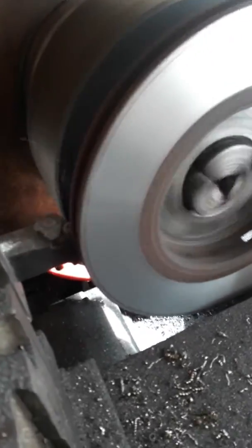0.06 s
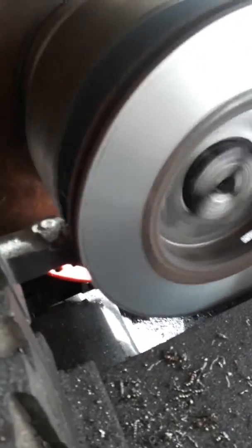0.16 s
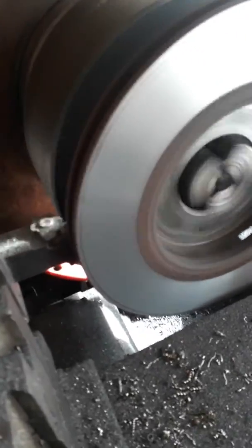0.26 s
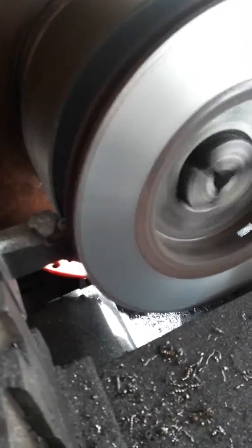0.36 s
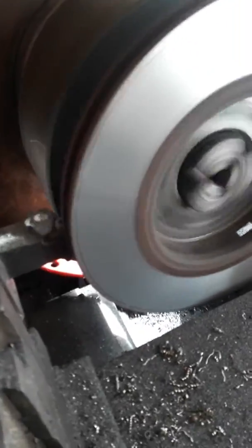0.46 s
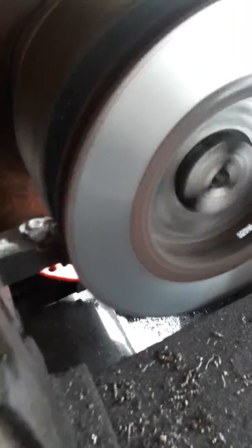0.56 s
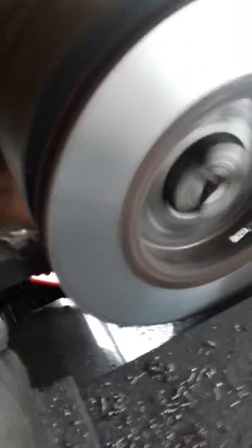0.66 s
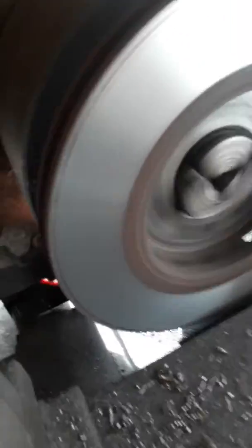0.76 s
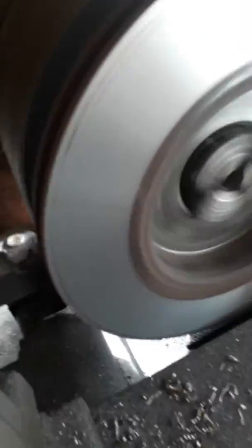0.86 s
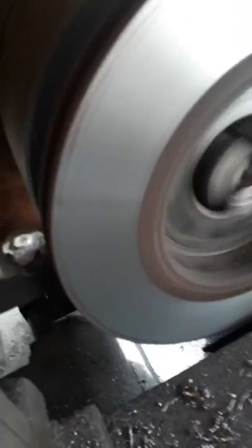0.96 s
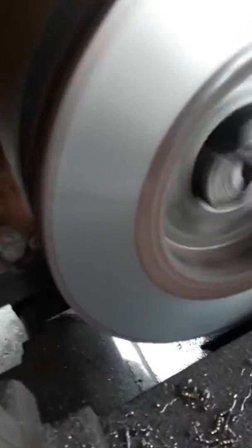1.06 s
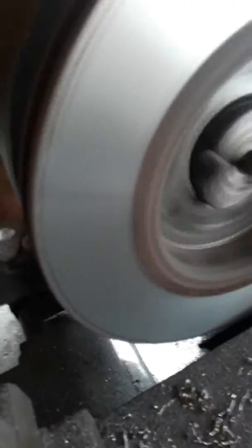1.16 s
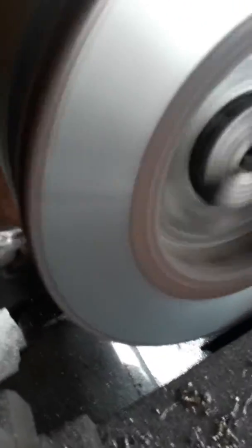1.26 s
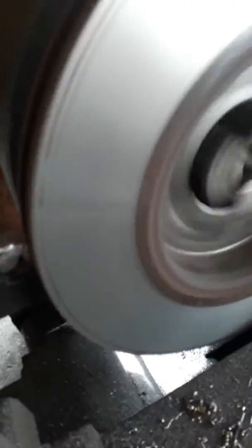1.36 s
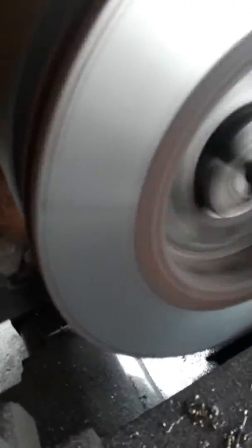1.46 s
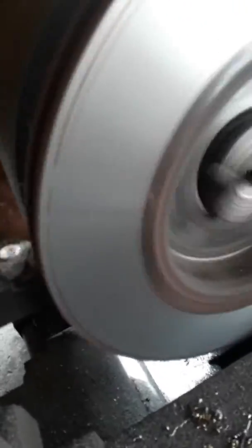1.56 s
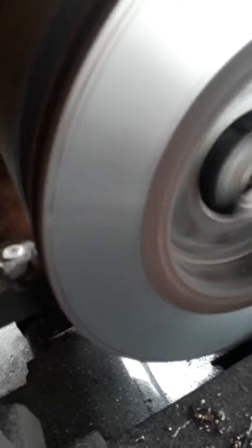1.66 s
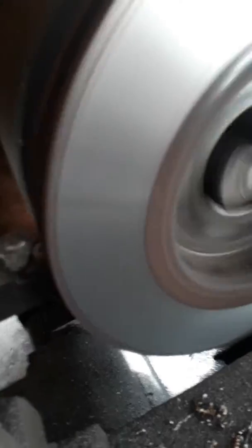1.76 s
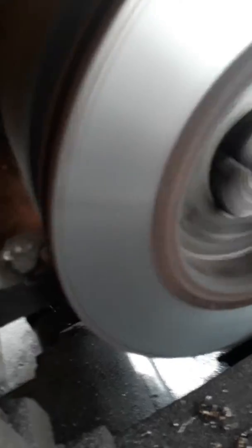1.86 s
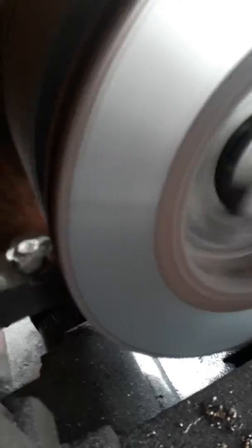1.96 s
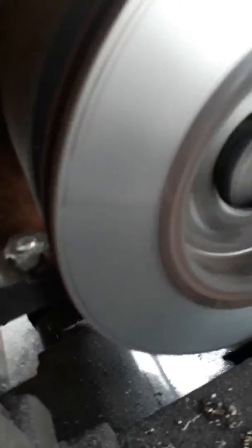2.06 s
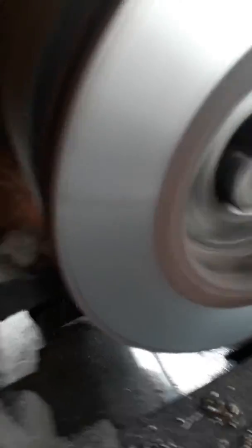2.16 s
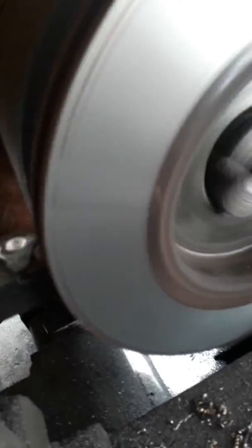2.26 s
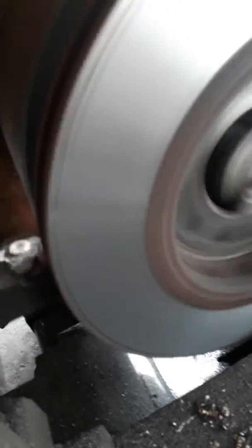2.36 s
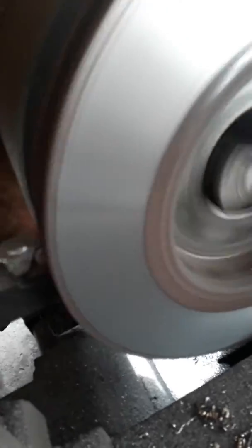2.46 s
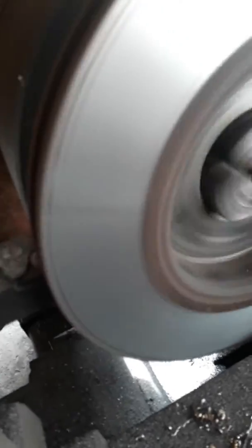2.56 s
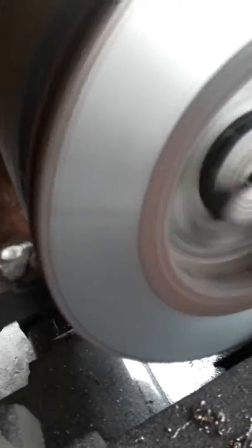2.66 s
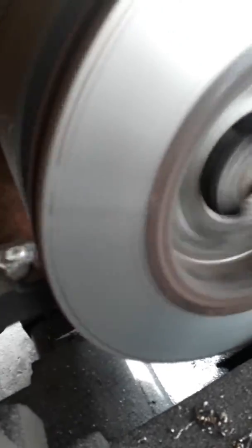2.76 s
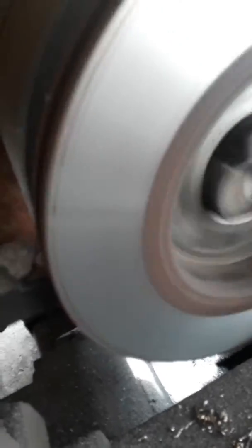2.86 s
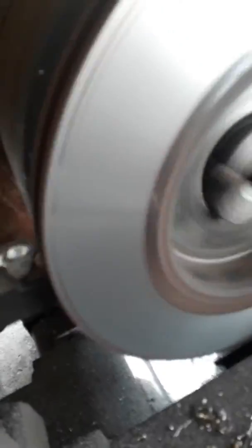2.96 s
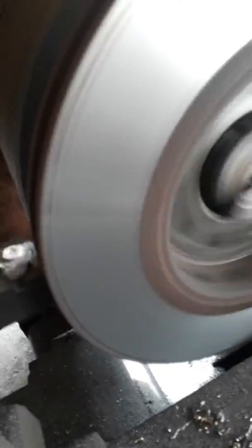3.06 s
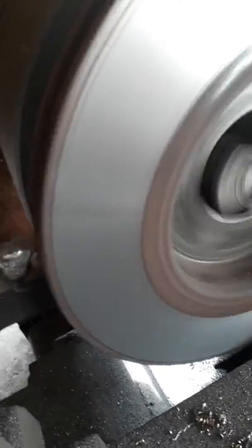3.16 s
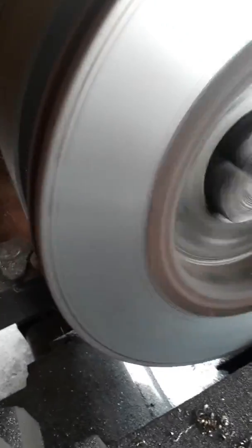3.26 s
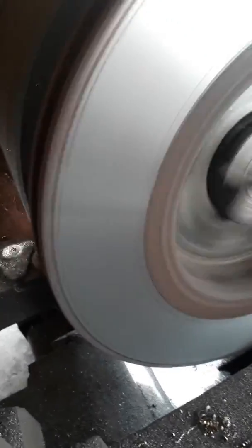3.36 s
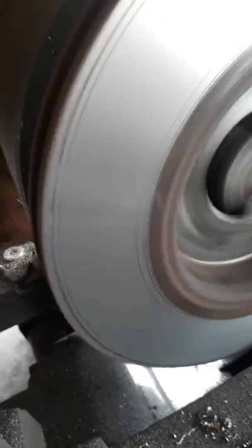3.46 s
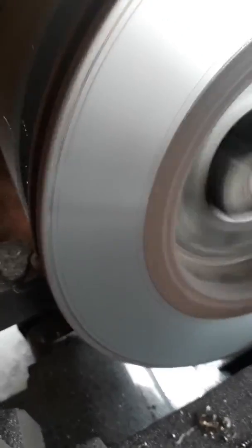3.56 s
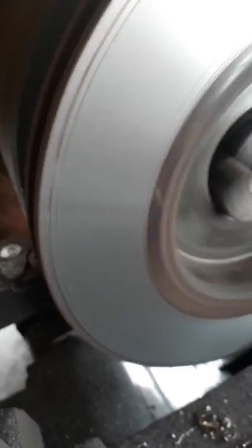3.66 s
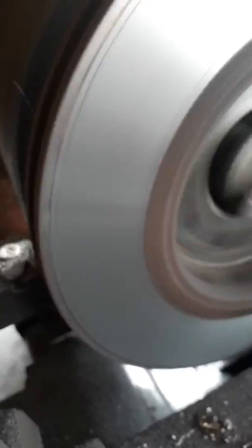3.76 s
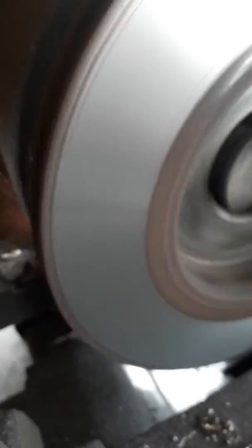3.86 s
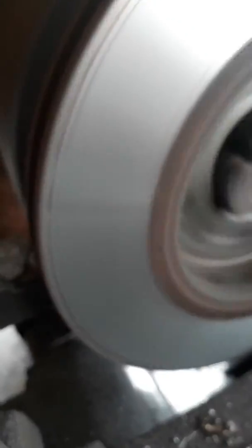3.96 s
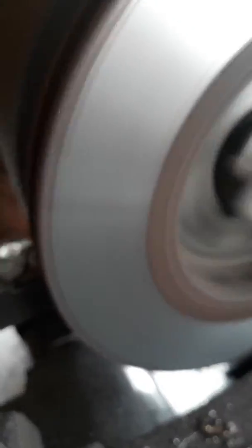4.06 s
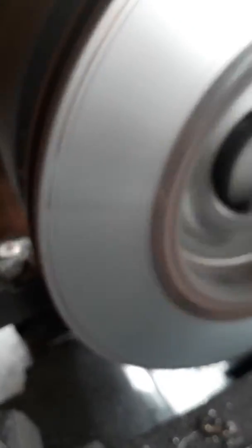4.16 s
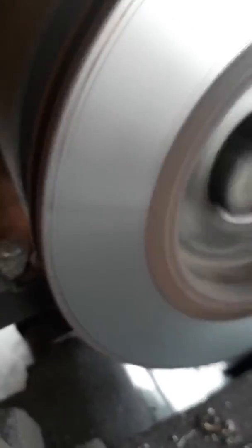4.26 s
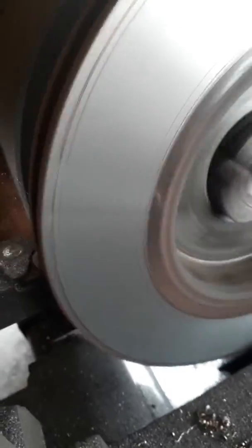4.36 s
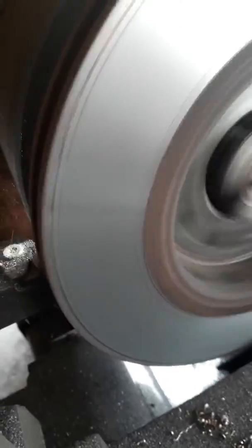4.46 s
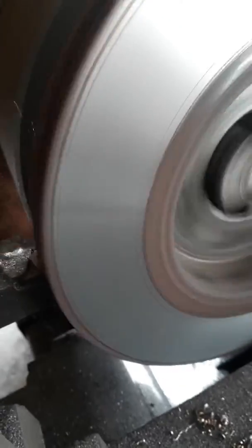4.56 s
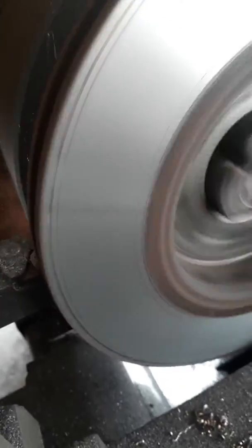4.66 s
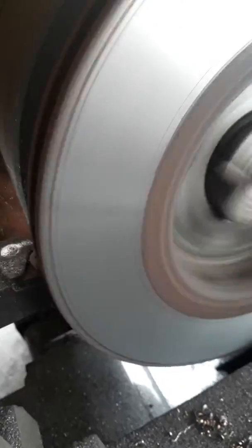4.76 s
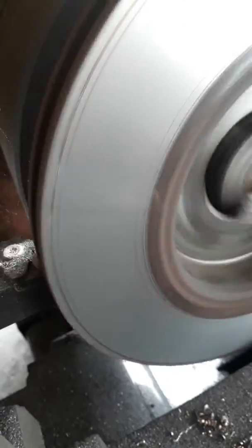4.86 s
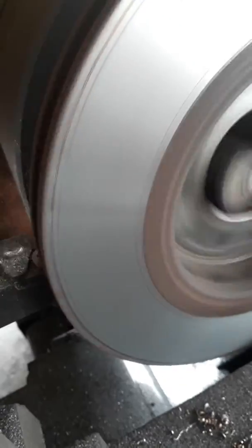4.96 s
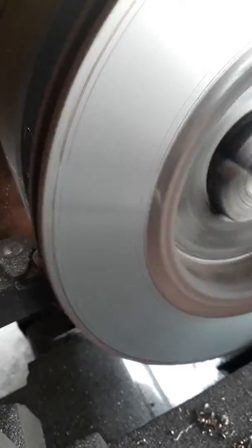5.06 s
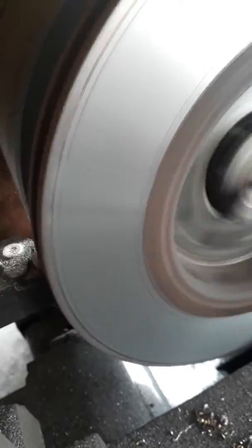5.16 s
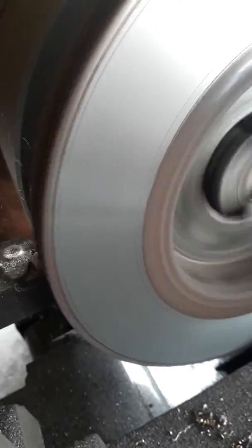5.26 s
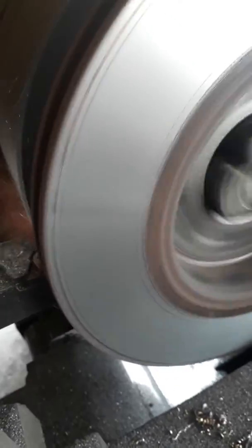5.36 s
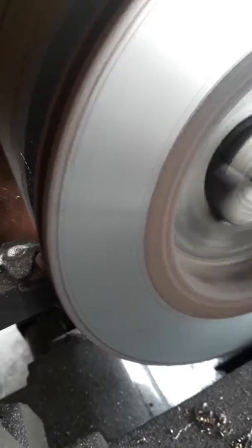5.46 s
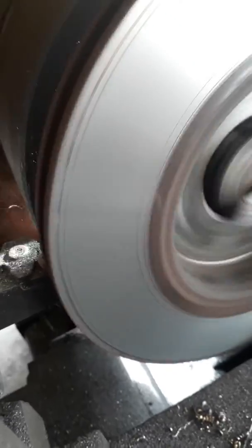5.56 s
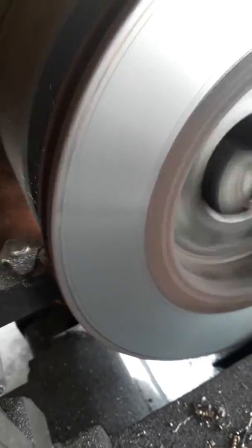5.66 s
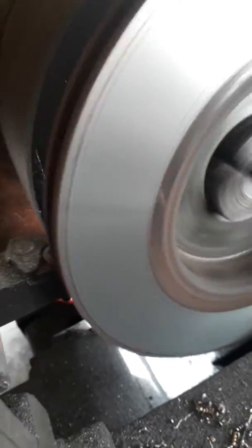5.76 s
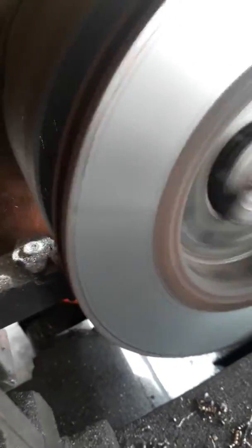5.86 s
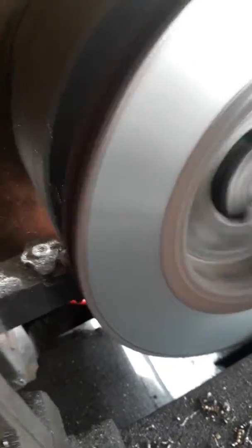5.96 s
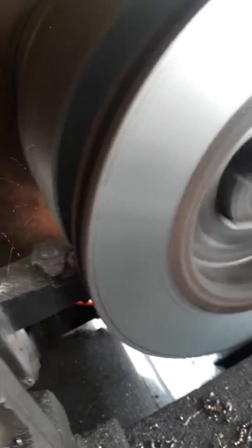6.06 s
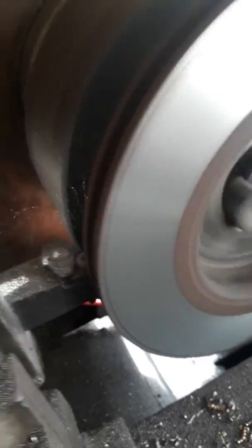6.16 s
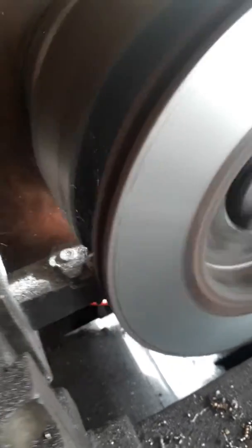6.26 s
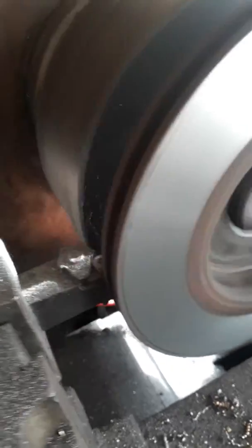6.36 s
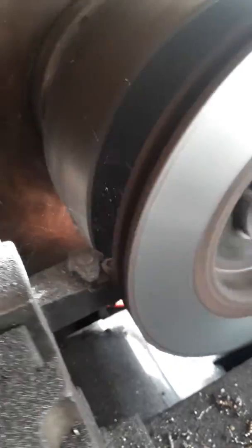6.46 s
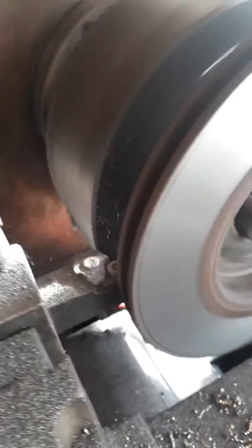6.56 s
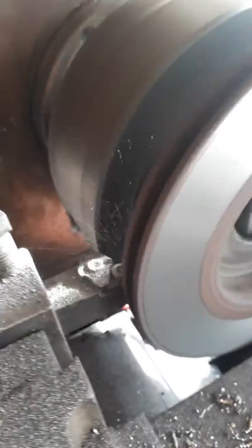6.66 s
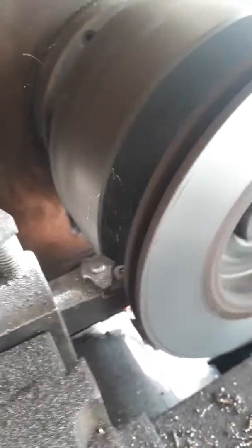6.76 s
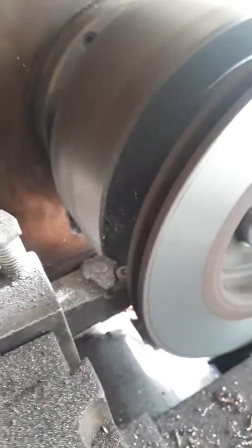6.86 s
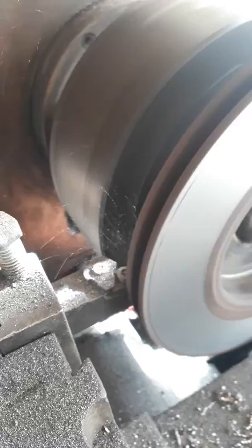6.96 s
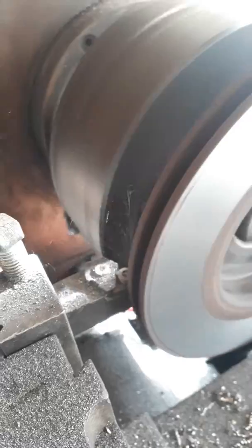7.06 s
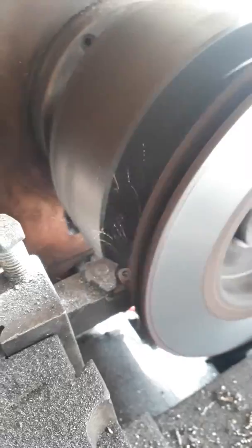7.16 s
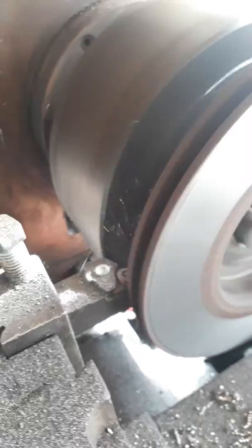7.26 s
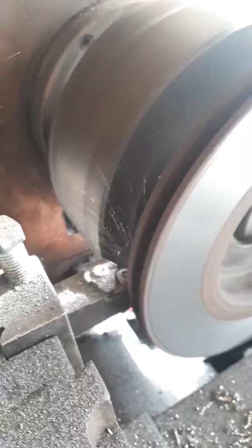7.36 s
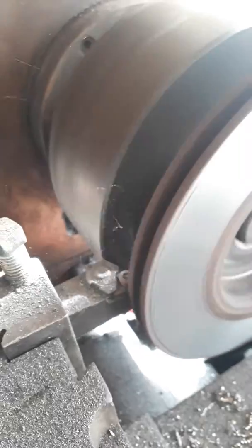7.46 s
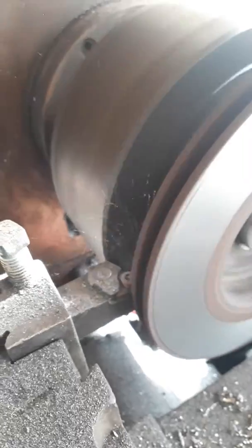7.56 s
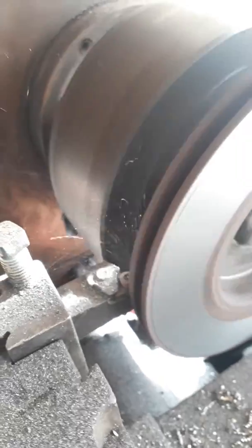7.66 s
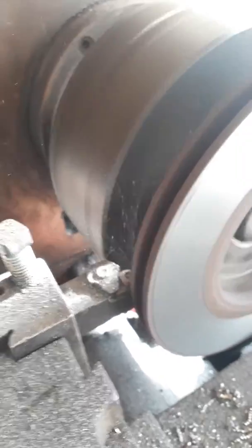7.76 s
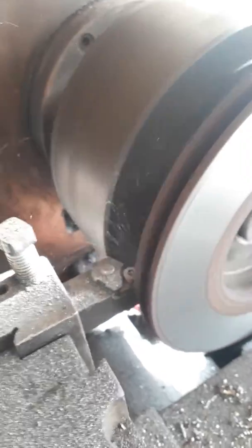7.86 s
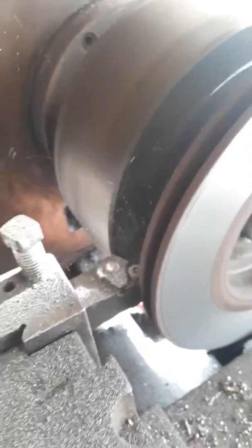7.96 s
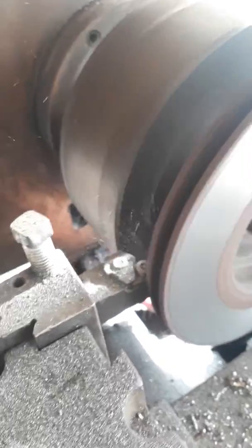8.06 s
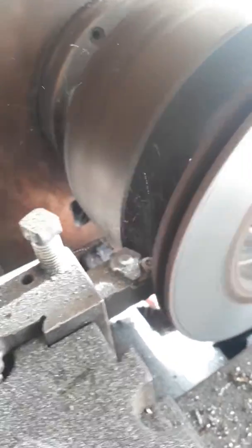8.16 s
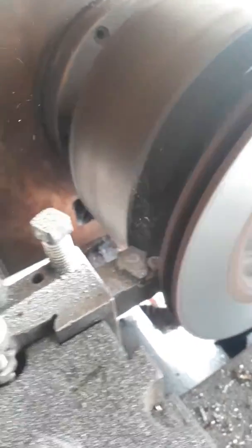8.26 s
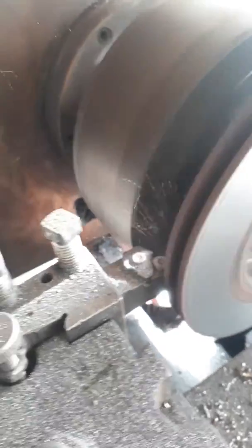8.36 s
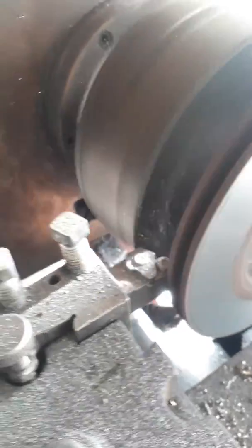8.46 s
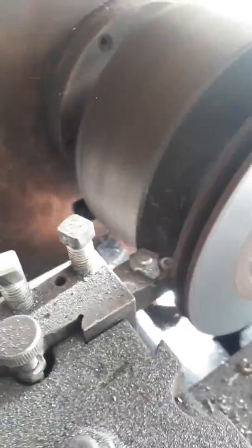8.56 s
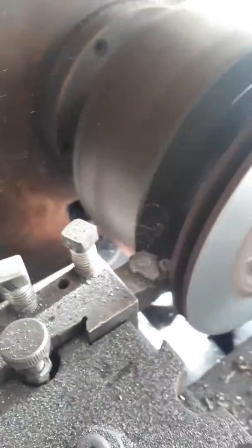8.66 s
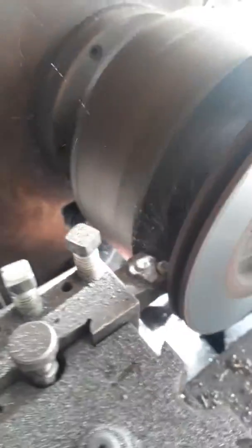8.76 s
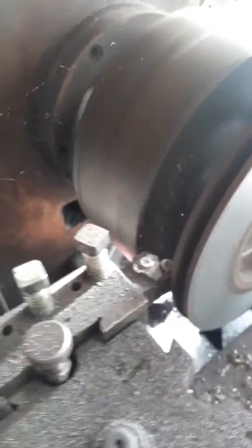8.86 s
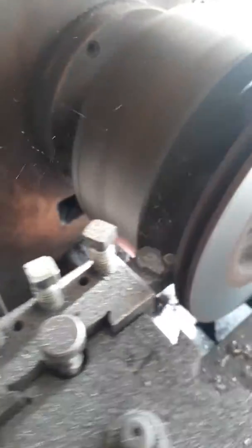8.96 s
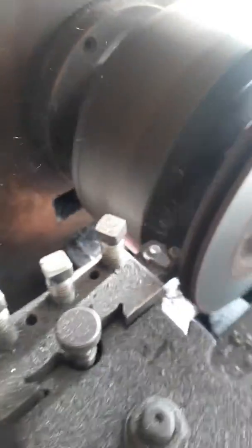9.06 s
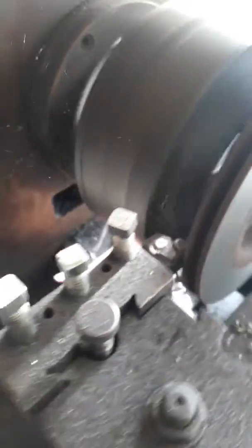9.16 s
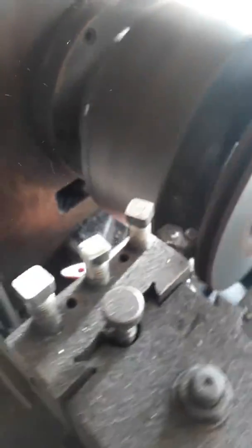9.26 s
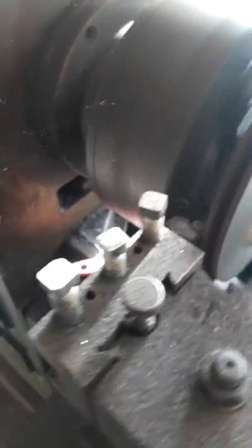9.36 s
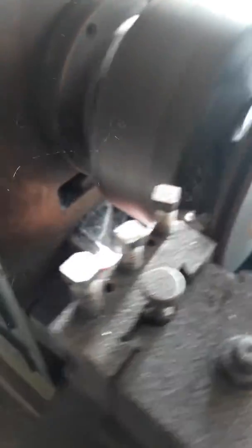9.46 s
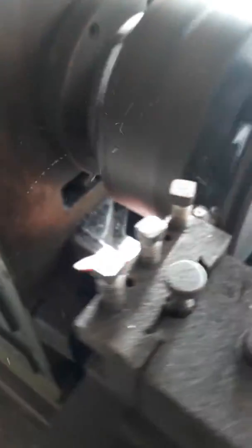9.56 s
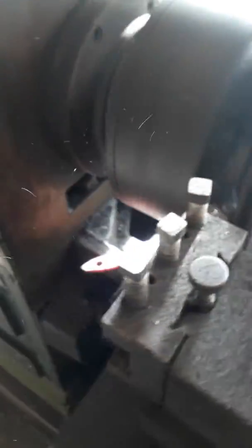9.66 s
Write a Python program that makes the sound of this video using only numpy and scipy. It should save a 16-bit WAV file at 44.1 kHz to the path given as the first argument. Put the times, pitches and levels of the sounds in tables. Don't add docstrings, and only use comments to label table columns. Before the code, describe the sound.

A lathe runs steadily in a workshop, its tool shaving a spinning cast-iron disc. A shrill, many-pitched metallic ring shimmers and beats with each turn, mixed with gritty scraping hiss. Beneath are low housing rumble, gear whine and a soft knocking, howling pulse about four times a second. The close handheld stereo microphone faces the disc, then swings to the tool post, where the ring weakens and the machinery stands out more.

```python
import sys
import numpy as np
from scipy import signal
from scipy.io import wavfile

SR = 44100
rng = np.random.default_rng(int(sys.argv[2]) if len(sys.argv) > 2 else 0)


def attenuation_scalar(level_db):
    decades = np.asarray(level_db, float) / 20
    return 10 ** decades


def unload_audio(sound):
    columns = np.transpose(np.atleast_2d(sound))
    steps = np.round(np.clip(columns, -1, 1) * 32767)
    wavfile.write(sys.argv[1], SR, steps.astype(np.int16))


N = 427769
SECONDS = np.arange(N) / SR
SHAFT_HZ = 14.087
SPINDLE_HZ = SHAFT_HZ * 20 / 66
SPINDLE_TURNS = SPINDLE_HZ * SECONDS
SIDES = np.array([[0.5], [-0.5]])


def rms_one(x):
    return x / np.sqrt(np.mean(np.abs(x) ** 2) + 1e-20)


def gain_of(db):
    return np.repeat(attenuation_scalar(db[..., ::8]), 8, axis=-1)[..., :N]


def at_hz(points, hz):
    table = np.array(points)
    return np.array([[np.interp(np.log(hz), np.log(table[:, 0]), c)] for c in table.T[1:]])


def at_view(levels_db, view):
    return np.interp(view, np.linspace(0, 2, len(levels_db)), levels_db)


def drift(rate_hz):
    pole = np.exp(-80 * np.pi * rate_hz / SR)
    white = rng.standard_normal(N // 40 + 2002)
    slow = signal.lfilter([1], [1, -2 * pole, pole * pole], white)[2000:]
    return np.interp(np.arange(N) / 40, np.arange(len(slow)), rms_one(slow))


def mode(force, hz, width_hz):
    pole = np.exp((2j * hz - width_hz) * np.pi / SR)
    return signal.lfilter([1], [1, -pole], force)


# t/s, view (0 disc face, 1 disc edge, 2 tool post), nearness level/dB
MICROPHONE_SWING = [(0, 0.44, -0.4), (.6, 0.53, .1), (1.4, 0.017, 0.3), (2.6, 0.021, 0.2),
                    (3.6, 0.012, 0.4), (5.2, 0.11, 0.6), (6.0, 0.41, -0.1), (6.5, 0.74, -0.1),
                    (7.1, 1.03, -0.1), (8.0, 1.22, 0.3), (8.7, 1.76, 0.7), (9.2, 2, .1), (9.7, 2.02, -3)]


def microphone():
    t, view, near_db = np.transpose(MICROPHONE_SWING)
    return np.interp(SECONDS, t, view), np.interp(SECONDS, t, near_db)


# f/Hz, likeness (-1 to 1)
PORT_LIKENESS = [(25, .97), (60, .99), (250, 0.87), (600, 0.57), (1200, -0.37), (2200, 0.6), (3200, -0.78),
                 (4600, -0.067), (6500, -0.11), (15000, 0.25)]


def banded_noise(band_db, low_hz, high_hz, count, patchy_db):
    out, together, edges = 0, drift(6.6), np.geomspace(low_hz, high_hz, count + 1)
    white = rng.standard_normal((2, 2, N)) * np.sqrt(SR / 4)
    for k, (low, high) in enumerate(zip(edges, edges[1:])):
        band = signal.butter(2, [low, high], "band", fs=SR, output="sos")
        mid, side = signal.sosfilt(band, white[k % 2])
        hz = np.sqrt(low * high)
        alike = np.clip(at_hz(PORT_LIKENESS, hz), -1, 1)
        gain = gain_of(band_db(hz) + patchy_db * (0.45 * together + drift(24)))
        out = out + gain * (np.sqrt(1 + alike) * mid + np.sqrt(1 - alike) * side * 2 * SIDES)
    return out


# f/Hz, level/dB per Hz
RUMBLE_SPECTRUM = [(25, -46), (60, -31), (120, -23), (200, -16.5), (330, -14.5), (450, -14), (600, -7.5),
                   (800, -8), (950, -8.5), (1250, -11.5), (1600, -20), (2400, -21.5)]
# f/Hz, bandwidth/Hz, level/dB, left-right difference/dB
HOUSING_MODES = [(90, 8.2, -26.5, 0.1), (126.4, 26, -18.5, 0), (203.4, 11, -13, -0.5), (236, 19, -18, 2.5),
                 (498, 52, -12, 5), (740, 90, -9, 6.5), (1045, 70, -5, 6.5), (1359, 77, -12, 2.5)]


def housing_rumble(view, near_db):
    rumble = rms_one(banded_noise(lambda hz: at_hz(RUMBLE_SPECTRUM, hz), 26.9, 2334, count=14, patchy_db=1.85))
    for hz, width, level_db, pan_db in HOUSING_MODES:
        shake = mode(rng.standard_normal((2, N)), hz, width).real
        alike = np.clip(at_hz(PORT_LIKENESS, hz)[0], 0, 1)
        shake[1] = alike * (shake[0] - shake[1]) + shake[1]
        rumble = rumble + rms_one(shake) * attenuation_scalar(level_db + SIDES * pan_db)
    level_db = near_db + at_view((-27.5, -26, -26), view)
    pan_db = at_view((-0.5, 0.5, -0.5), view)
    return rumble * attenuation_scalar(level_db + SIDES * pan_db)


def gear_lines(table, turn_hz, swell_db, own_db):
    out, waver = np.zeros((2, N)), drift(0.82)
    for multiple, left_db, right_db, lead in table:
        multiple = round(multiple)
        phase = 2 * np.pi * (multiple * turn_hz * SECONDS + rng.random())
        phase = phase + 0.65 * np.roll(waver, rng.integers(N))
        level_db = own_db.get(multiple, np.array([[left_db], [right_db]]) + swell_db)
        out += np.sqrt(2) * gain_of(level_db) * np.sin(phase + [[lead], [0]])
    return out


# multiple of shaft speed, left level/dB, right level/dB, left lead/rad
SHAFT_WHINE = [(20.0, -48.0, -46.0, 0.3), (35.0, -40.0, -41.0, -0.1), (36.0, -36.0, -45.0, 0.3),
               (37.0, -48.0, -49.0, 0.4), (41.0, -48.0, -49.0, 0.3), (42.0, -47.0, -51.0, 1.0),
               (44.0, -56.0, -49.0, 1.0), (45.0, -49.0, -56.0, 0.5), (46.0, -46.0, -43.0, 1.3),
               (47.0, -28.0, -27.0, 0.8), (48.0, -45.0, -42.0, 0.7), (49.0, -48.0, -39.0, -0.1),
               (51.0, -54.0, -48.0, 0.9), (54.0, -46.0, -46.0, 0.7), (57.0, -52.0, -47.0, 2.4),
               (58.0, -51.0, -47.0, 2.9), (60.0, -39.0, -46.0, 0.7), (64.0, -49.0, -65.0, 1.1),
               (66.0, -55.0, -48.0, -1.1), (72.0, -39.0, -42.0, -0.9), (74.0, -45.0, -53.0, 0.0),
               (83.0, -45.0, -47.0, -3.0), (87.0, -48.0, -50.0, -2.9), (91.0, -45.0, -49.0, -2.4),
               (93.0, -50.0, -46.0, -0.9), (94.0, -46.0, -42.0, 2.2), (95.0, -42.0, -52.0, -1.8),
               (141.0, -41.0, -52.0, -0.7)]
# multiple of shaft speed,
# left level/dB at face, edge, tool post, right level/dB at face, edge, tool post
DIRECTED_WHINE = [(141, -40, -49, -36, -50, -43, -36), (72, -43, -32, -29, -42, -44, -36),
                  (60, -41, -35, -38, -43, -43, -43), (94, -48, -39, -37, -45, -36, -34),
                  (36, -40, -41, -44, -42, -43, -50)]
# multiple of spindle speed, left level/dB, right level/dB, left lead/rad
SPINDLE_WHINE = [(65, -51, -54, .3), (67, -49, -50, .4), (131, -49, -52, .6), (133, -46, -47, .5),
                 (156, -45, -47, .8)]


def gear_whine(view, near_db):
    own_db = {}
    for multiple, *both_db in DIRECTED_WHINE:
        left_db, right_db = both_db[:3], both_db[3:]
        own_db[round(multiple)] = near_db + [at_view(left_db, view), at_view(right_db, view)]
    swell_db = near_db + at_view((-0.6, 1.6, 1), view)
    shaft = gear_lines(SHAFT_WHINE, SHAFT_HZ, swell_db, own_db)
    return shaft + gear_lines(SPINDLE_WHINE, SPINDLE_HZ, np.zeros(N), {})


# t/part of a turn, peak level/dB
JAW_KNOCKS = [
    (.06, -20.5),
    (.4, -27),
    (.73, -30),
]
# f/Hz, 60 dB decay time/s, left level/dB, right level/dB
KNOCK_RINGS = [(486, 0.13, 10, -18), (520, 0.15, -17, 5)]


def spindle_knocks():
    blows = np.zeros(N + SR)
    for part, peak_db in JAW_KNOCKS:
        at = ((np.arange(42) + part) / SPINDLE_HZ * SR).astype(int)
        blows[at] = attenuation_scalar(peak_db + 2.5 * rng.standard_normal(len(at)))
    soft = mode(mode(blows[:N], 490, 82), 490, 82)
    soft = rms_one(soft) * np.sqrt(np.mean(blows ** 2))
    out = np.zeros((2, N))
    for hz, t60, left_db, right_db in KNOCK_RINGS:
        ring = mode(soft, hz, np.log(1000) / np.pi / t60).imag
        out += attenuation_scalar(np.array([[left_db], [right_db]]) - 37.0) * ring
    return out


# centre f/Hz, sweep each turn/Hz, looseness/Hz,
# left level/dB, right level/dB, swell/dB, peak/part of a turn
BEARING_HOWLS = [(492.2, 14.35, 4, -33.5, -33.5, 3, 0.19), (1059, 13.5, 14, -33.5, -39, 1.5, 0.68)]


def bearing_howls():
    out = np.zeros((2, N))
    jaws_db = 1.5 * np.cos(6 * np.pi * (SPINDLE_TURNS - 0.12))
    for hz, sweep_hz, loose_hz, left_db, right_db, swell_db, part in BEARING_HOWLS:
        load = np.cos(2 * np.pi * (SPINDLE_TURNS - part))
        carrier = np.exp(2j * np.pi * np.cumsum(hz + sweep_hz * load) / SR)
        quadrature = np.array([drift(loose_hz), drift(loose_hz)])
        loose = 1 + 0.4 * (drift(loose_hz) + 1j * quadrature)
        level_db = swell_db * load + jaws_db + [[left_db], [right_db]]
        out += (carrier * rms_one(loose)).real * np.sqrt(2) * gain_of(level_db)
    return out


def headstock():
    view, near_db = microphone()
    return housing_rumble(view, near_db) + gear_whine(view, near_db) + spindle_knocks() + bearing_howls()


# f/Hz, left and right level/dB per Hz at face, at edge, at tool post
CHIP_SPECTRUM = [(1200, -60, -59, -58, -83, -69, -57), (1710, -58.5, -64, -64, -60, -66, -64),
                 (2150, -52.5, -49, -62, -53, -65, -70), (2650, -82, -56.5, -75, -50.5, -54, -54.5),
                 (3550, -65, -55.5, -55, -57.5, -73, -60), (4450, -77, -65, -60, -62, -63, -64),
                 (4700, -50, -55, -66, -78, -59, -71), (5280, -72.5, -60, -56, -75, -62, -73),
                 (6830, -62.5, -67, -74, -59, -66, -68), (8200, -72, -94, -82, -80, -72, -76),
                 (9600, -67.5, -81, -72, -85, -74, -87), (11500, -110, -114, -74, -83, -75, -83),
                 (13360, -80, -74, -75, -68, -67, -78), (14900, -82, -72, -79, -85, -73, -82)]


def chips(view):
    shares = np.clip(1 - np.abs(view - np.arange(3)[:, None]), 0, 1)

    def chip_db(hz):
        return at_hz(CHIP_SPECTRUM, hz).reshape(3, 2).T @ shares

    return banded_noise(chip_db, 1103, 16230, count=22, patchy_db=2.0)


# f/Hz, bandwidth/Hz, left and right level/dB in its family,
# level gained per view/dB, left lead/rad at face, at edge
DISC_MODES = [(2408.8, 31.4, -0.45, 0.1, -0.5, 4, 5), (3991, 44, 2, 1.2, -0.5, 1.58, 1.4),
              (5626, 27, 2.6, 1.9, -0.4, -0.4, 1.6), (7193, 45, -1.5, -1, -0.1, 1.3, 1.5),
              (7400, 40, -1.5, 1.5, -2.3, 0, 0), (6350, 79, -23, -24, 6, 0, -2),
              (8965, 63, -3.5, -10.5, -2.3, 1.5, 1.1), (10645, 52, -4.5, -13, -2, 1, 1),
              (11440, 200, -49, -39, 11, 17, 0), (12280, 130, -8.5, -5.5, -1, 0.8, 1.5),
              (12800, 170, -14, -15, 0.7, 4, 4), (14170, 130, -5.5, -6, -1.5, 1.8, 2),
              (15640, 200, -14, -11.5, -3.5, 5, 0), (8300, 140, -28, -22, -6, 2, 4),
              (4820, 750, -11, 6.5, 0, 2, 2), (2607.4, 130, -2.5, -30, 3, 2.64, 1.63),
              (7080, 290, -7, -11, -5.5, -5, 0.7)]
RING_FAMILY_HZ = np.array([2400, 4000, 5645, 7300])
# level/dB at view 0, 0.5, 1, 1.5, 2
RADIATION_LEFT = [(-13.5, -16.5, -18, -23.5, -30), (-22, -21.5, -26, -33, -30.5),
                  (-22.5, -22.5, -28.5, -24.5, -25), (-21.5, -21.5, -24.5, -29, -25.5),
                  (-28.5, -28.5, -29, -27, -28)]
# level/dB at view 0, 0.5, 1, 1.5, 2
RADIATION_RIGHT = [(-14, -15, -20, -19, -17.5), (-19, -16, -25.5, -26, -34), (-28, -26.5, -31, -30.5, -41),
                   (-38, -29.5, -26, -35, -35.5), (-32.5, -37, -35, -32, -39.5)]
# left and right level/dB at the face,
# left and right level gained per view/dB, beat peak/cycles
WAVE_BALANCE = [(0, -10.5, -4, 8, 0.86), (-4.5, 8.5, 3.5, -4, 0.41), (1.5, 6, -2, -6, .3),
                (2, 0, -11, .8, 0.63), (1.5, 2.2, -3.5, -.8, 0.15)]


def disc(cut_db):
    view, near_db = microphone()
    levels_db = [near_db + [at_view(left, view), at_view(right, view)]
                 for left, right in zip(RADIATION_LEFT, RADIATION_RIGHT)]
    forces = rng.standard_normal((2, N)) * attenuation_scalar(cut_db)
    locked = 0.33
    out = np.zeros((2, N))
    for hz, width, left_db, right_db, view_db, lead, edge_lead in DISC_MODES:
        family = np.argmax(np.append(np.abs(RING_FAMILY_HZ - hz) < 200, True))
        diameters = round(3 + (hz - 2400) / 1650)
        split_hz = diameters * SPINDLE_HZ
        ahead_left_db, ahead_right_db, gained_left_db, gained_right_db, peak = WAVE_BALANCE[family]

        near = mode(forces, hz, 11 * width)
        back = rms_one(mode(near[0], hz - split_hz, width))
        free = rms_one(mode(near[1], hz + split_hz, width))
        beat = np.exp(2j * np.pi * (2 * diameters * SPINDLE_TURNS - peak))
        ahead = locked * back * beat + np.sqrt(1 - locked ** 2) * free

        share = gain_of(np.array([ahead_left_db + gained_left_db * view,
                                  ahead_right_db + gained_right_db * view]))
        left = (back + share[0] * ahead) * np.exp(1j * (lead + (edge_lead - lead) * view))
        right = share[1] * ahead - back
        level_db = levels_db[family] + [[left_db], [right_db]] + view_db * view + 0.7 * drift(15.6)
        out += np.real([left, right]) * gain_of(level_db) * np.sqrt(2 / (1 + share ** 2))
    return out + chips(view) * attenuation_scalar(cut_db - 2.0)


def scene():
    run_out_db = 0.5 * np.cos(2 * np.pi * (SPINDLE_TURNS - 0.62))
    jaws_db = 0.34 * np.cos(6 * np.pi * (SPINDLE_TURNS - 0.21))
    grain_db = 0.45 * drift(49)
    return headstock() + disc(run_out_db + jaws_db + grain_db)


def roll_off(x):
    return signal.sosfilt(signal.butter(12, 15770, fs=SR, output="sos"), x)


def record(dry):
    thin = signal.sosfilt(signal.butter(2, 90, "high", fs=SR, output="sos"), dry)
    mix = 1.147 * np.tanh(thin / 1.098)
    return roll_off(mix)


dry = scene()
out = record(dry)
unload_audio(out)
```